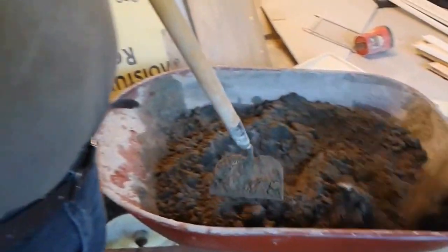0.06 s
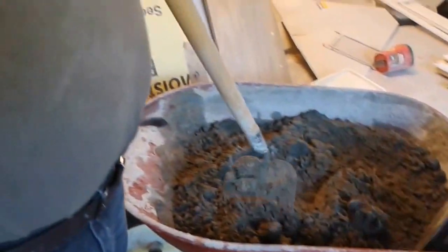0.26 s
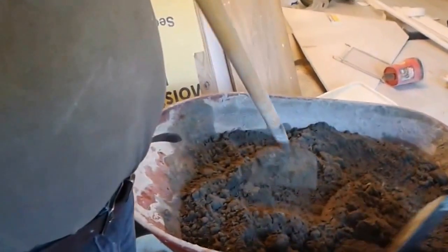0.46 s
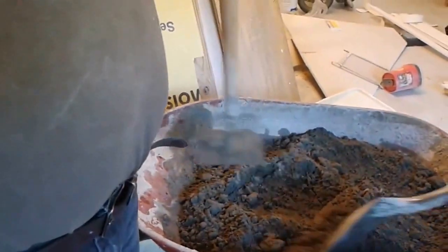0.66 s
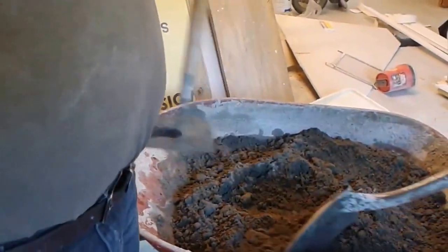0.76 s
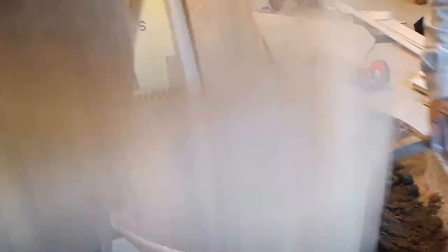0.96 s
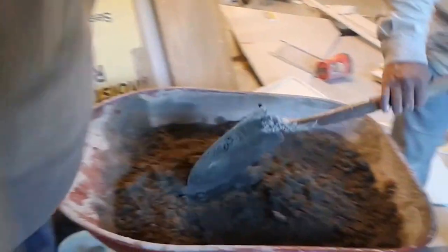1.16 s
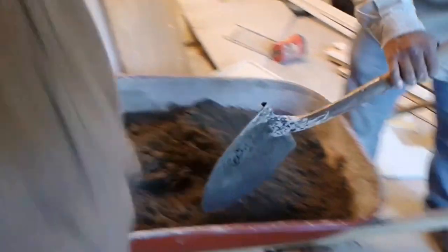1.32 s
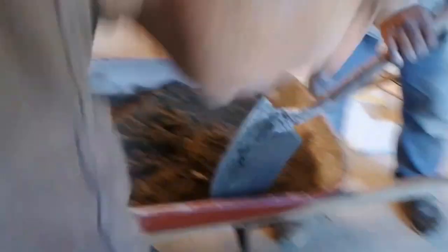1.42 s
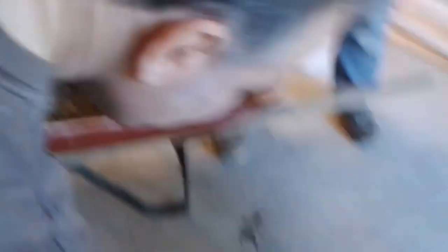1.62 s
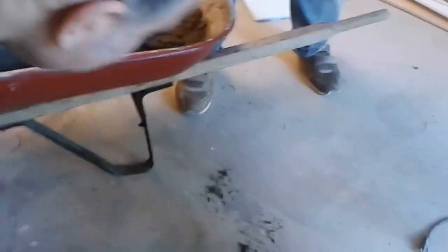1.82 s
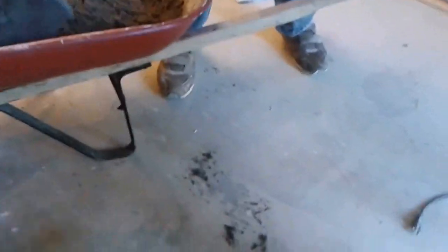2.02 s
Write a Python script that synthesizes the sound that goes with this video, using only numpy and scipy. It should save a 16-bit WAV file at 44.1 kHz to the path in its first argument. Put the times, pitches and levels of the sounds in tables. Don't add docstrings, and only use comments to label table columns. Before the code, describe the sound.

Close stereo pickup of mortar being worked in a metal wheelbarrow inside a bare building; a hard bite and hissing drag, a short quiet gap with small rubs, then clanky knocks and a loud crunching shove, short echoes.

```python
import sys
import numpy as np
from scipy import signal
from scipy.fft import rfft, irfft, next_fast_len
from scipy.io import wavfile
from scipy.ndimage import uniform_filter1d

SR = 44100
rng = np.random.default_rng(int(sys.argv[2]) if len(sys.argv) > 2 else 0)


def dump(signal):
    limited = np.clip(np.atleast_2d(signal).T, -1, 1)
    pcm = np.round(limited * 32767).astype(np.int16)
    wavfile.write(sys.argv[1], SR, pcm)


def volts_from_db(level):
    exponent = np.asarray(level, float) / 20
    return 10 ** exponent


N = 91904
PATCH_DB = 1


def rms_one(x):
    return x / np.sqrt(np.mean(x ** 2) + 1e-20)


def stroke(rows):
    s, *columns = np.transpose(rows)
    t = np.arange(N) / SR
    inside = uniform_filter1d(((t >= s[0]) & (t <= s[-1])) * 1.0, size=60)
    return [inside * volts_from_db(np.interp(t, s, c)) for c in columns]


def at_hz(points, hz):
    table_hz, value = np.array(points)[:, :2].T
    return np.interp(np.log(hz), np.log(table_hz), value)


def drift(rate):
    hop = 40
    r = np.exp(-2 * np.pi * rate * hop / SR)
    white = rng.standard_normal(N // hop + 2002)
    slow = signal.lfilter([1], [1, -2 * r, r * r], white)[2000:]
    return np.interp(np.arange(N) / hop, np.arange(len(slow)), rms_one(slow))


# frequency in Hz, likeness from 0 to 1.
LIKENESS = [(40, 0.54), (110, 1), (220, 0.79), (450, 0.9), (900, 0.57), (1800, 0.11), (4000, 0.0052)]


def spread(pair, hz):
    alike = np.clip(at_hz(LIKENESS, hz), 0, 1)
    return np.sqrt(1 + alike) * pair[0] + np.sqrt(1 - alike) * pair[1] * [[1], [-1]]


def colour(drive, spectrum, patch_db):
    out, power = 0, 0
    edges = 30 * 2 ** np.arange(0, 9.6, .5)
    for k, (low, high) in enumerate(zip(edges, np.minimum(edges[1:], 19000))):
        hz = np.sqrt(low * high)
        band_pass = signal.butter(2, [low, high], "band", fs=SR, output="sos")
        band = signal.sosfilt(band_pass, drive[k % 2] + 1e-18)
        level_db = at_hz(spectrum, hz)
        out = out + volts_from_db(level_db + patch_db * drift(5.6)) * spread(band, hz)
        power += volts_from_db(level_db) ** 2 * (high - low) / SR * 2 * (hz < 15000)
    return out / np.sqrt(power)


def ring(drive, hz, r):
    tone = signal.lfilter([1, 0, -1], [1, -2 * r * np.cos(2 * np.pi * hz / SR), r * r], drive + 1e-18)
    return np.sqrt((1 - r * r) / 2) * tone


def resonate(drive, peaks):
    wander_db = 2.0
    out = 0
    for k, (hz, width, db) in enumerate(peaks):
        push = drive[k % 2] * volts_from_db(wander_db * drift(11.0))
        out = out + volts_from_db(db) * spread(ring(push, hz, np.exp(-np.pi * width / SR)), hz)
    return out


# start in seconds, boost in dB, decay time T60 in seconds.
LUMPS = [(.3433, -0.5, 0.015), (0.372, 11, 0.021), (0.396, 5.5, 0.046), (0.4259, 11, 0.05), (.442, 3, .05),
         (0.453, 4.5, .05), (0.5177, 4.5, 0.043), (0.589, 4.5, 0.064), (0.7196, 6, 0.053), (1.51, 9, 0.088),
         (1.647, 6.5, 0.069), (1.7381, 1, 0.053), (1.786, 2.5, 0.024), (1.8566, 1, 0.051), (1.81, 4, 0.036),
         (1.89, 3, .05), (1.92, 5.5, .06), (1.944, 3, 0.049), (1.965, 1, 0.033)]


def grains():
    grains_per_s, grain_spread_db, clump_db = 14000, 0.5, 1
    t = np.arange(N) / SR
    born = rng.random(N) < grains_per_s / SR
    clumps = clump_db * (drift(15) + drift(150))
    size = volts_from_db(grain_spread_db * np.minimum(rng.exponential(1, N), 5) + clumps)
    jolt_db = 0
    for s, db, t60 in LUMPS:
        jolt_db = jolt_db + db * (t >= s) * volts_from_db(-60 * np.maximum(t - s, 0) / t60)
    return rms_one(born * size) * volts_from_db(jolt_db) * rng.standard_normal((2, 2, N))


# frequency in Hz, density in dB per Hz.
AIR = [(18, -37), (30, -2.5), (102, 0.5), (467, -16.5), (5890, -19), (14000, -24), (15500, -55)]


def air():
    return volts_from_db(-49) * colour(rng.standard_normal((2, 2, N)), AIR, patch_db=1.5)


# time in seconds, grit level in dB.
SHUFFLES = [
    [(0, -46.5), (.08, -58.5), (.34, -53.5)],
    [(1.03, -56), (1.045, -43.5), (1.055, -47), (1.08, -56)],
    [(1.164, -40.5), (1.19, -36.5), (1.23, -47.5), (1.28, -48), (1.35, -62)],
    [(1.365, -54), (1.385, -48), (1.393, -38.5), (1.43, -35), (1.5, -39.5), (1.59, -43.5), (1.64, -42)],
]
# frequency in Hz, density in dB per Hz.
SHUFFLE_GRIT = [(71, -53), (120, -6), (1530, -9.5), (1830, -5), (2700, -5.5), (5610, -0.5), (13400, -21.5),
                (14300, -29), (15500, -89)]
# frequency in Hz, width in Hz, level in dB.
SHUFFLE_BLADE = [(1815, 140, -7), (3200, 200, -21), (5480, 270, -11)]


def shuffles():
    grit = grains()
    level = sum(stroke(rows)[0] for rows in SHUFFLES)
    blade = resonate(grit * stroke(SHUFFLES[-1])[0], SHUFFLE_BLADE)
    return colour(grit * level, SHUFFLE_GRIT, PATCH_DB) + blade


# time in seconds, level in dB.
SQUEAL = [
    (.07, -75),
    (.1, -62.5),
    (.14, -64),
    (.2, -64.5),
    (.23, -72),
]
# frequency in Hz, width in Hz, level in dB.
SQUEAL_RING = [(3000, 70, -3), (3130, 45, 0)]


def squeal():
    return resonate(grains() * stroke(SQUEAL)[0], SQUEAL_RING)


def heavy(rows, grit, tray, low, tray_db, sway_db):
    level, pressure, sway = stroke(rows)
    drive = grains() * level
    ringing = volts_from_db(tray_db) * resonate(drive * pressure, tray)
    swaying = volts_from_db(sway_db) * resonate(drive * sway, low)
    return colour(drive, grit, PATCH_DB) + ringing + swaying


# time in seconds, grit level in dB, pressure on the tray in dB, floor sway in dB.
PULL = [
    (.341, -28, 2, -5.5),
    (.349, -16.5, -2, -11),
    (.385, -27.5, -7, -9.5),
    (.43, -23, -8, -8.5),
    (.62, -27, 3, -10),
    (.74, -25.5, 2.5, -9.5),
    (.84, -31, 5.5, -18),
    (.9, -40.5, 0.5, -18),
    (1.0, -49, 2, -11),
]
# frequency in Hz, density in dB per Hz.
PULL_GRIT = [(71, -37), (120, -32), (170, -8.5), (250, -8.5), (390, -8), (1240, -8), (5610, -5),
             (14000, -14), (15500, -26)]
# frequency in Hz, width in Hz, level in dB.
PULL_TRAY = [(420, 104, -2.5), (527, 77, -4), (783, 39, -5), (986, 120, -3.5), (1125, 24, -6.5),
             (1520, 90, -3.5), (1930, 530, 0), (3000, 130, -2.5)]
# frequency in Hz, width in Hz, level in dB.
FLOOR_MODES = [(163, 11, -0.5), (185.9, 5, -4), (202, 18, -7)]


def pull():
    return heavy(PULL, PULL_GRIT, PULL_TRAY, FLOOR_MODES, tray_db=-11.5, sway_db=-5)


KNOCKS = [(0.341, -17, 0.0032, -1), (0.353, 0, 0.0052, 0), (.385, -6, 0.0041, -0.5),
          (0.666, -17.5, 0.0089, 3), (0.712, -20, 0.0065, 3), (0.729, -24, 0.014, 3),
          (.75, -23.5, 0.0068, 3), (0.806, -30, 0.0089, 3), (1.511, -21, 0.00099, 2),
          (1.513, -20.5, 0.0014, 2), (1.541, -27, 0.0018, 2), (1.6446, -14, 0.0023, 1.5),
          (1.66, -24, 0.004, 1), (1.68, -30, 0.011, 1), (1.705, -27, .01, 3), (1.736, -22, 0.0054, 0),
          (1.752, -15, 0.0034, 1), (1.768, -30, .004, -3.5), (1.744, -22, 0.013, 0.5)]
# frequency in Hz, level in dB, decay time T60 in seconds.
OBJECTS = [
    [(133, -18, 0.1), (163.6, -1, 0.05), (201, -23, 0.017), (452.5, -19, 0.13), (1595, -15, 0.048)],
    [(450, 3, 0.16), (502, 6, 0.1), (1160, 0, 0.04), (1550, -3, 0.093), (3200, -7, .04), (5400, -8, 0.074)],
    [(530, -6.5, 0.027), (607, 7, 0.014), (987, -0.5, 0.039), (1730, -1, 0.028), (2470, 1.5, 0.016),
     (3210, 0.5, 0.021), (4550, -6, 0.01), (5900, -11, 0.01), (260, -8, .06), (780, -1, 0.031),
     (1320, -4, 0.012), (3720, -10, .012)],
    [(177, 2, 0.1), (398, -0.5, 0.11)],
]


def knocks():
    out = np.zeros(N)
    luck = rng.normal(0, 1.5, (len(KNOCKS), 12))
    for row, (s, db, rise, thing) in zip(luck, KNOCKS):
        i = int(s * SR)
        t = np.arange(min(N - i, SR // 2)) / SR
        struck = 0
        for g, (hz, mode_db, t60) in zip(row, OBJECTS[int(round(thing))]):
            struck = struck + volts_from_db(db + mode_db - 4 + g - 60 * t / t60) * np.sin(2 * np.pi * hz * t)
        out[i:i + len(t)] += struck * np.sin(np.pi / 2 * np.minimum(t / rise, 1)) ** 2
    return out


def pebbles():
    pebbles_per_s, ring_cycles, pitches = 540, 70, 28
    born = rng.random(N) < pebbles_per_s / SR
    size = volts_from_db(4 * np.minimum(rng.exponential(1, N), 3))
    hits = rms_one(born * size * rng.standard_normal((2, N)))
    hits = hits * (stroke(PULL)[0] + stroke(PUSH)[0])
    dealt = rng.integers(0, pitches, N)
    out = 0
    for k, hz in enumerate(np.geomspace(1200, 12000, pitches)):
        out = out + ring(hits * (dealt == k), hz, volts_from_db(-60 * hz / ring_cycles / SR))
    return volts_from_db(-8) * out


# time in seconds, upper ring in dB, lower ring in dB.
LIFT = [
    (.74, -51, -63),
    (.795, -35, -46),
    (.825, -45, -35),
    (.855, -40, -56),
    (.93, -58, -50),
    (1.0, -62, -52),
    (1.06, -74, -55),
    (1.1, -85, -68),
]
# frequency in Hz, width in Hz, level in dB.
LIFT_UPPER = [(748, 15, 3.5), (1010, 25, -10)]
LIFT_LOWER = [(627, 24, 0)]


def lift():
    grit = grains()
    upper, lower = stroke(LIFT)
    return resonate(grit * upper, LIFT_UPPER) + resonate(grit * lower, LIFT_LOWER)


# time in seconds, level in dB.
SETTLE = [
    (1.512, -39),
    (1.545, -40.5),
    (1.59, -43),
    (1.64, -48),
]
# frequency in Hz, density in dB per Hz.
SETTLE_GRIT = [(100, -13), (200, 0.5), (500, -2.5), (1100, -3), (1600, -14), (15000, -32)]


def settle():
    return colour(grains() * stroke(SETTLE)[0], SETTLE_GRIT, PATCH_DB)


# time in seconds, grit level in dB, pressure on the tray in dB, wall sway in dB.
PUSH = [
    (1.643, -23.5, -14, 8),
    (1.67, -27.5, -5, 5.5),
    (1.715, -25.5, 2, 6.5),
    (1.75, -18, 5.5, 6),
    (1.79, -19.5, 3, -6),
    (1.85, -20, -4.5, -20),
    (1.96, -19.5, -4, -18.5),
    (2.03, -20.5, -6.5, -16),
    (2.084, -27, -5, -6),
]
# frequency in Hz, density in dB per Hz.
PUSH_GRIT = [(71, -52), (120, -23.5), (441, -7.5), (541, -10), (733, 0), (796, -6.5), (5380, -4.5),
             (14000, -11), (15500, -30)]
# frequency in Hz, width in Hz, level in dB.
PUSH_TRAY = [(608, 29, -7.5), (998, 114, 3.5), (1242, 40, -1.5), (1550, 73, -0.5), (2090, 320, -2.5),
             (3080, 90, -0.5), (5270, 310, -0.5), (6270, 770, -10.5)]
# frequency in Hz, width in Hz, level in dB.
WALL_MODES = [(99, 22, -10.5), (191, 42, -5.5), (338, 33, -3.5), (442, 29, 0), (502, 39, -2.5)]


def push():
    return heavy(PUSH, PUSH_GRIT, PUSH_TRAY, WALL_MODES, tray_db=-15.0, sway_db=-12)


def room(x):
    t60_s, wall_cut_hz = 0.43, 5300
    size = next_fast_len(N + SR)
    w = 2 * np.pi * np.arange(size // 2 + 1) / size
    dull = np.exp(-2 * np.pi * wall_cut_hz / SR)
    wall = (1 - dull) / (1 - dull * np.exp(-1j * w))
    out = []
    for side, lags in zip(x, rng.uniform(.015, .045, (2, 10)) * SR):
        response = 0
        for k, d in enumerate(lags):
            loop = volts_from_db(-60 * d / SR / t60_s) * wall * np.exp(-1j * w * int(d))
            response = response + (-1) ** k * loop / (1 - loop)
        out.append(irfft(rfft(side, size) * response, size)[:N])
    return np.array(out)


def duck(near):
    from_db, ratio, time_s = -23.5, 2, 0.52
    r = np.exp(-1 / (time_s * SR))
    power = signal.lfilter([1 - r], [1, -r], np.mean(near ** 2, axis=0))
    level_db = 10 * np.log10(power + 1e-12)
    return volts_from_db(-ratio * np.maximum(level_db - from_db, 0))


def high_pass(x, order, hz):
    return signal.sosfilt(signal.butter(order, hz, "high", fs=SR, output="sos"), x)


def scene():
    sides = np.array([[.5], [-.5]])
    near = volts_from_db(0.9 * sides) * (pull() + lift() + squeal()) + push()
    near = near + settle() + volts_from_db(0.3 * sides) * shuffles() + knocks() + pebbles()
    near = high_pass(near, 4, 98)
    left, right = room(high_pass(near, 1, 224))
    middle = (left + right) / 2
    side = high_pass(left - right, 2, 546) / 2
    tail = volts_from_db(-11.5) * (middle + side * [[1], [-1]])
    return near + tail + duck(near) * air()


def top_cut(x):
    return signal.sosfilt(signal.butter(12, 15850, fs=SR, output="sos"), x)


# frequency in Hz, gain in dB.
CAPSULE = [(40, -9.5), (130, -1.5), (4200, -2), (5600, 3.5), (7600, -0.5), (10000, -7), (13000, -2),
           (14600, -5.5)]
# frequency in Hz, left minus right in dB.
PORTS = [(100, -0.5), (640, 0), (1410, 0.5), (2500, 6.5), (5000, 6.5), (8000, -8), (10000, -10.5),
         (14000, -1)]


def record(dry):
    ceiling, cutoff_hz = 0.66, 14700
    size = next_fast_len(N + 4096)
    hz = np.maximum(np.arange(size // 2 + 1) * SR / size, 1)
    response = volts_from_db(at_hz(CAPSULE, hz) + at_hz(PORTS, hz) / 2 * [[1], [-1]]) * (hz < cutoff_hz)
    overloaded = ceiling * np.tanh(dry / ceiling)
    mix = irfft(rfft(overloaded, size) * response, size)[:, :N]
    return top_cut(mix)


dry = scene()
out = record(dry)
dump(out)
```